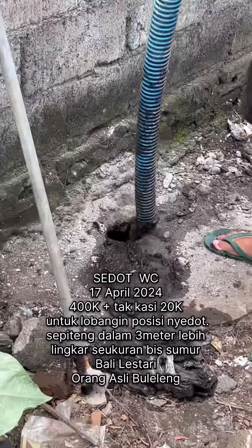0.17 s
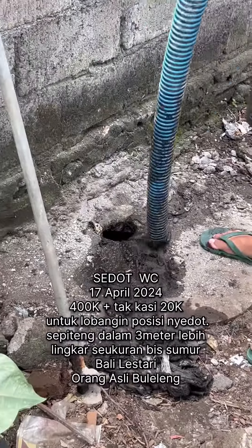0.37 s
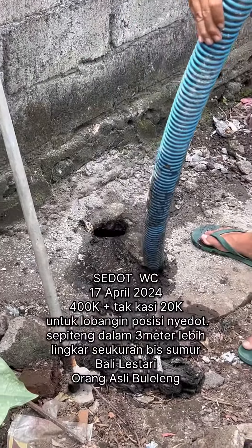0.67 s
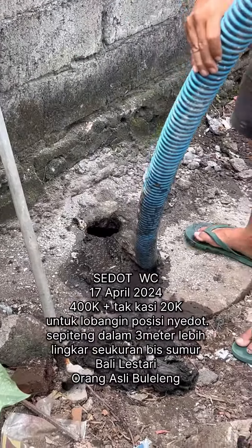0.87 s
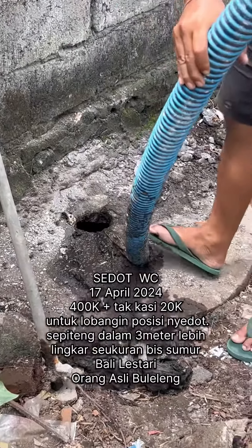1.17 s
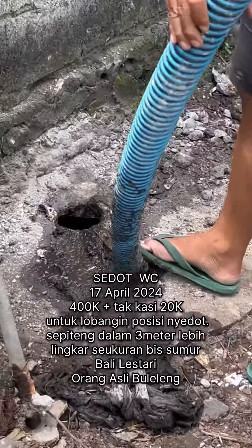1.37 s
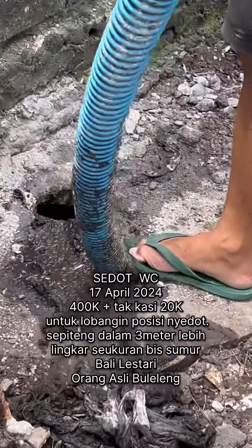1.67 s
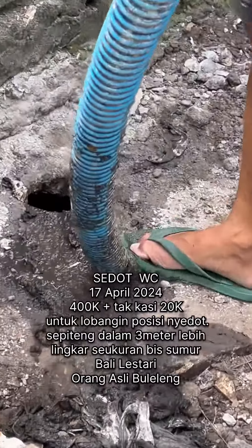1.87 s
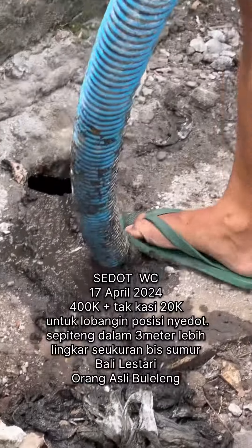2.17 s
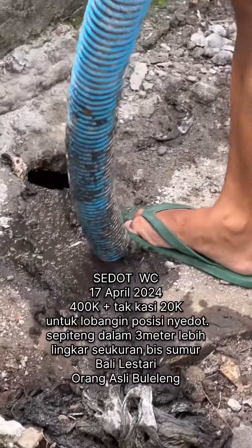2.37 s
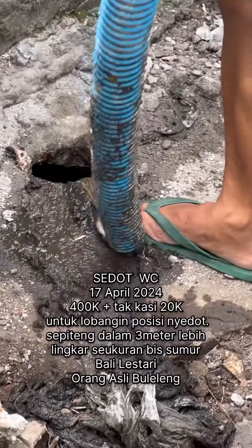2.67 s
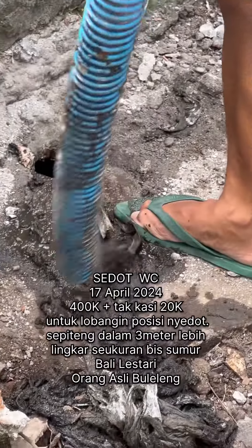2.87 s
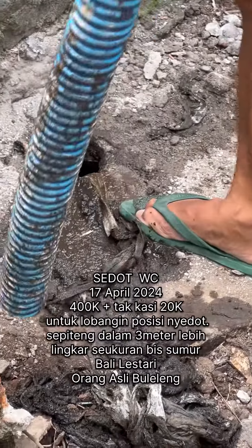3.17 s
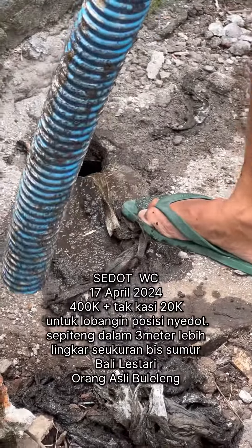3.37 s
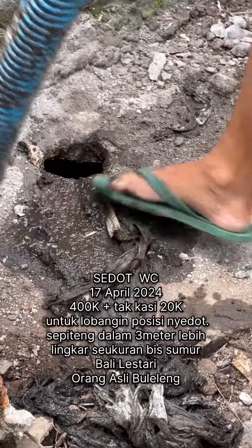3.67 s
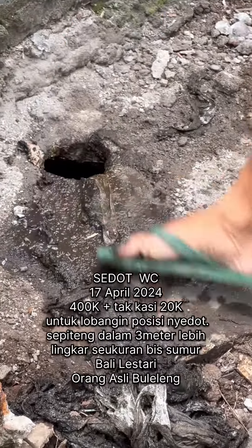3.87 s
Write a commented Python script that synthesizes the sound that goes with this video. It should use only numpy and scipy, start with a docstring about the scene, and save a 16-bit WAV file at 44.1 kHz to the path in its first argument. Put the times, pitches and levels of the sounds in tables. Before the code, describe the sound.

Close, mono outdoor sound of air sucked through a ribbed hose over a low rumble; the wet roar builds for over two seconds, then falls abruptly to thumps, small clicks and a faint whistle.

```python
"""A rush of air comes first: it is sucked through the mouth of a ribbed hose held just over the ground. The rush swells,
then drops as the hose is lifted away, leaving gulps in the hose, a thin whistle and a few ticks of grit.
The air is coloured noise with wet grains, combed by the ground's echo; narrow noise bands flare up briefly and a low
noise rumble runs underneath. Gulps and whistle are gliding sines, ticks are decaying noise and tones.
One microphone, the same on both channels."""
import sys
import numpy as np
from scipy import signal
from scipy.fft import rfft, irfft, next_fast_len
from scipy.io import wavfile
from scipy.ndimage import uniform_filter1d, map_coordinates

SR = 44100
rng = np.random.default_rng(int(sys.argv[2]) if len(sys.argv) > 2 else 0)


def master(y):
    """Save y as 16-bit WAV."""
    cut = np.clip(np.atleast_2d(y).T, -1, 1)
    pcm = np.round(cut * 32767)  # scale
    wavfile.write(sys.argv[1], SR, pcm.astype(np.int16))


N = 176400  # samples, 4 s


def amp(db):
    """dB to gain."""
    return 10 ** (np.asarray(db) / 20)


def unit(x):
    """Scaled to rms 1."""
    return x / np.sqrt(np.mean(x ** 2) + 1e-20)


def along(points, hz):
    """Value at each frequency, read between (Hz, value) points on a log axis."""
    f, v = np.transpose(points)
    return np.interp(np.log(hz + 1), np.log(f + 1), v)


def curves(rows):
    """One value per sample for each column after the time."""
    s, *columns = np.transpose(rows)
    return [np.interp(np.arange(N) / SR, s, column) for column in columns]


def wobble(rate):
    """A smooth random curve through normally distributed knots, rate knots a second."""
    knots = rng.standard_normal(int(N * rate / SR) + 4)
    return map_coordinates(knots, [np.arange(N) * rate / SR])


def filtered(x, response):
    """x times a complex response of frequency, padded so that its tail does not wrap round."""
    m = next_fast_len(N + SR // 2)
    return irfft(rfft(x, m) * response(np.fft.rfftfreq(m, 1 / SR)), m)[..., :N]


def coloured(x, spectrum, lo_hz=1, hi_hz=SR):
    """x through a spectrum between two soft edges, rms 1."""
    def response(hz):
        low, high = (hz / lo_hz) ** 8, (hz / hi_hz) ** 8
        return amp(along(spectrum, hz)) * np.sqrt(low / (1 + low) / (1 + high))
    return unit(filtered(x, response))


def noise(patchy_db, streak_db):
    """White noise with broad patches and narrow lasting streaks of random gain."""
    x = rng.standard_normal(N + 2048)
    # (frame in samples, depth in dB, smoothing over bins, smoothing over frames)
    for frame, depth_db, wide, long in [(512, patchy_db, 5, 10), (2048, streak_db, 4, 14)]:
        z = signal.stft(x, nperseg=frame)[2]
        field = uniform_filter1d(rng.standard_normal(z.shape), size=wide, axis=0)
        field = uniform_filter1d(field, size=long, axis=1)
        x = signal.istft(z * amp(depth_db * unit(field)), nperseg=frame)[1]
    return x[:N]


# Levels of the rumble. Each row: time in seconds, then deep, middle and upper part in dB.
RUMBLE_LEVELS = [(0.0, -47, -45, -32), (0.04, -36, -30.5, -30.5), (0.38, -27.5, -33, -34),
                 (0.6, -45, -36, -36), (0.79, -42, -35.5, -34.5), (0.81, -51, -40.5, -38),
                 (1.08, -40.5, -31, -36.5), (1.26, -48, -36.5, -36.5), (1.45, -33, -30.5, -32),
                 (1.48, -44, -40, -44), (1.54, -25, -36, -32.5), (1.75, -48, -36.5, -37.5),
                 (2.08, -42, -42, -36.5), (2.12, -37, -29, -38), (2.17, -46, -44, -35),
                 (2.33, -53, -38.5, -42), (2.71, -47, -36, -37.5), (2.75, -40, -33, -34),
                 (2.8, -34, -44, -39.5), (2.9, -35, -26, -32), (3.01, -33, -36.5, -41.5),
                 (3.06, -46, -39.5, -45.5), (3.27, -31, -39, -41), (3.34, -45, -42, -47),
                 (3.38, -35, -39, -34), (3.44, -31, -27.5, -40.5), (3.48, -32, -38, -34),
                 (3.51, -31, -34.5, -37.5), (3.6, -43, -42.5, -46.5), (3.74, -33, -41, -42),
                 (3.79, -50.5, -45, -47), (3.87, -41, -39, -39), (3.98, -50, -38, -44.5),
                 (4.0, -58, -41, -36)]
# Colours of the three parts. Each row: frequency in Hz, relative level in dB.
DEEP_COLOUR = [(24, -44), (40, -21), (53, -3), (70, 1), (105, -0.5), (140, -35), (240, -120)]
MIDDLE_COLOUR = [(60, -40), (100, -8.5), (140, 0), (220, -1), (290, -20.5), (500, -120)]
UPPER_COLOUR = [(150, -40), (230, -3), (290, 1.5), (340, -1.5), (422, -5), (520, -17.5), (680, -24),
                (1140, -120)]


def rumble():
    """A low rumble: three bands of noise whose levels share one lumpy unsteadiness."""
    lumps_db = 1.14 * wobble(11) + 0.43 * wobble(25.03)
    out = np.zeros(N)
    for level_db, colour in zip(curves(RUMBLE_LEVELS), [DEEP_COLOUR, MIDDLE_COLOUR, UPPER_COLOUR]):
        out += amp(level_db + lumps_db) * coloured(noise(patchy_db=1.4, streak_db=0.8), colour)
    return out


# Ticks of grit. Each row: start in seconds, level in dB of the crack before its rise and the top cut, pitch in Hz,
# ring amplitude against crack rms (ratio), decay by 60 dB in seconds, snap level in dB before the top cut.
GRIT_TICKS = [(2.856, -25, 3530, .86, .045, -23.5), (2.862, -21.5, 740, .4, 0.07, -45),
              (2.868, -27, 2780, 0.89, 0.13, -45), (3.0005, -27, 4470, 1.8, .035, -26),
              (3.002, -28, 2400, 0.76, 0.14, -45), (3.089, -28, 1840, .5, 0.032, -36),
              (3.109, -30, 6110, .3, .02, -36), (3.21, -31, 4000, .3, .02, -32),
              (3.36, -25, 1250, 0.78, .09, -39), (3.351, -33.5, 3270, 2.1, 0.11, -40),
              (3.3854, -28, 5000, .5, .022, -21), (3.393, -36, 9000, .1, .02, -28),
              (3.427, -21.5, 1090, 0.45, .035, -30), (3.51, -30, 1300, .4, .03, -37),
              (3.6563, -26, 2690, 0.59, .025, -27), (3.662, -28, 6500, .2, .04, -32),
              (3.7081, -22, 6240, 0.25, 0.022, -20), (3.807, -37, 7500, 0.27, .015, -35),
              (3.817, -24, 3380, 1.4, 0.016, -28), (3.8968, -28, 1760, .5, 0.035, -35)]
TICK_RISE_S, SNAP_T60_S, TICK_TOP_HZ = .0004, .005, 9500


def grit():
    """Short dry ticks: a sharp noise snap, then a noise crack with a ring at the same pitch, both decaying."""
    out, t = np.zeros(N + SR), np.arange(SR // 10) / SR
    for s, db, hz, ring, t60, snap_db in GRIT_TICKS:
        band = signal.butter(2, [hz * 0.56, min(hz * 1.52, SR / 3)], "bandpass", fs=SR)
        crack = unit(signal.lfilter(*band, rng.standard_normal(len(t))))
        shape = amp(db - 60 * t / t60) * (1 - np.exp(-t / TICK_RISE_S))
        snap = amp(snap_db - 60 * t / SNAP_T60_S) * rng.standard_normal(len(t))
        tick = shape * (ring * np.sin(2 * np.pi * hz * t) + crack) + snap
        out[round(s * SR):][:len(t)] += tick

    def top_cut(hz):
        ratio = hz / TICK_TOP_HZ
        return 1 / (1 + 1j * ratio * np.sqrt(2) - ratio ** 2) ** 2
    return filtered(out[:N], top_cut)


# The whistle. Each row: time in seconds, pitch in Hz, level in dB, level of the octave in dB.
WHISTLE_PATH = [(2.72, 5640, -45, -58), (2.74, 5640, -36, -54), (2.768, 5640, -48, -62),
                (2.786, 5630, -39, -52), (2.83, 5605, -42, -58), (2.855, 5600, -58, -70),
                (2.9, 5600, -55, -66), (2.93, 5600, -41, -60), (3.035, 5595, -39, -59),
                (3.055, 5570, -56, -64), (3.11, 5580, -49, -60), (3.14, 5605, -38, -55),
                (3.185, 5608, -34, -55), (3.215, 5550, -58, -68), (3.268, 5600, -43, -59),
                (3.3, 5612, -37.5, -61), (3.446, 5616, -33.5, -54), (3.5, 5650, -42, -47),
                (3.53, 5648, -38, -48), (3.614, 5588, -37.5, -63), (3.7, 5636, -35, -49),
                (3.75, 5642, -43, -54), (3.83, 5600, -35, -53), (3.86, 5572, -45, -68),
                (3.906, 5580, -40, -62), (3.974, 5510, -51, -75), (4.0, 5540, -43, -65)]
WHISTLE_WAVER_HZ, WHISTLE_FLICKER_DB = 9, 1.8  # sizes of the random waver and flicker


def whistle():
    """A thin wavering sine with a weak octave, heard once the rush has dropped."""
    hz, level_db, octave_db = curves(WHISTLE_PATH)
    phase = 2 * np.pi * np.cumsum(hz + WHISTLE_WAVER_HZ * wobble(70)) / SR
    # fades in over the 20 ms before the first row
    start = np.clip((np.arange(N) / SR - WHISTLE_PATH[0][0]) / .02 + 1, 0, 1)
    tone = amp(level_db) * np.sin(phase)
    octave = amp(octave_db + 3.3 * wobble(110)) * np.sin(2 * phase)
    flicker = amp(WHISTLE_FLICKER_DB * wobble(90))
    return np.sqrt(2) * start * flicker * (tone + octave)  # sqrt(2): levels are rms


# Gulps in the hose. Each row: start in seconds, level in dB before the attack and GULP_GAIN, starting pitch in Hz,
# decay by 60 dB in seconds.
HOSE_GULPS = [(2.726, -20.5, 146, 0.19), (2.823, -9.5, 129, 0.043), (2.863, -16, 164.7, 0.33),
              (2.965, -20.5, 95, 0.21), (3.365, -25, 144.5, 0.33), (3.41, -20, 112, 0.19),
              (3.493, -20.5, 94, 0.11)]
GULP_GAIN, GULP_ATTACK_S = 1.65, 0.0082
GULP_SAG, GULP_SAG_S = 0.24, 0.027  # share by which the pitch falls, time constant of the fall


def gulps():
    """Slugs of air thump in the hose: decaying sines, each falling in pitch."""
    out, t = np.zeros(N + SR), np.arange(SR // 2) / SR
    for s, db, hz, t60 in HOSE_GULPS:
        pitch = hz * (1 - GULP_SAG * (1 - np.exp(-t / GULP_SAG_S)))
        shape = amp(db - 60 * t / t60) * (1 - np.exp(-t / GULP_ATTACK_S))
        out[round(s * SR):][:len(t)] += GULP_GAIN * shape * np.sin(2 * np.pi * np.cumsum(pitch) / SR)
    return out[:N]


# Brief flares of one hose resonance. Each row: middle in seconds, length in seconds, pitch in Hz,
# level in dB before the roughness.
HOSE_FLARES = [(0.637, 0.043, 2510, -28), (0.842, 0.085, 3170, -24), (1.105, 0.067, 3150, -27),
               (2.647, 0.11, 1540, -27), (3.371, 0.043, 1900, -34.5)]
FLARE_WIDTH_HZ = 200  # from the middle of the band to 1/e


def flares():
    """One resonance of the hose flares up briefly: swells of rough noise in a narrow band."""
    t, rough = np.arange(N) / SR, amp(2.9 * wobble(70))
    out = np.zeros(N)
    for s, length, pitch, db in HOSE_FLARES:
        band = filtered(rng.standard_normal(N), lambda hz: np.exp(-((hz - pitch) / FLARE_WIDTH_HZ) ** 2))
        swell = np.exp(-(2 * (t - s) / length) ** 4)
        out += amp(db) * swell * unit(band)
    return rough * out


SPATTER_PER_S, SPATTER_HZ = 180, 1790  # grains a second, middle pitch
SPATTER_CYCLES = 31.5  # scale of a grain's life, times 0.49 to 1.49
SPATTER_BEND = -0.0073  # slight downward bend of the pitch along a grain


def spatter():
    """Wet grains: short damped tones at random times, pitches scattered over two octaves, rms 1."""
    when, pitch, size, life = rng.random((4, int(SPATTER_PER_S * N / SR)))
    hz = SPATTER_HZ * 4 ** (pitch - .5)[:, None]
    t = np.arange(SR // 16) / SR
    age = t * hz / (SPATTER_CYCLES * (0.49 + life[:, None]))
    shape = (0.23 + size[:, None] ** 2) * age * np.exp(-3 * age)
    grains = shape * np.sin(2 * np.pi * hz * t * (1 + SPATTER_BEND * age))
    at = (when * N).astype(int)[:, None] + np.arange(len(t))
    return unit(np.bincount(at.ravel(), grains.ravel(), N + SR)[:N])


# Path of the hose mouth. Each row: time in seconds, position number from 0 to 5, in the order of the colours below.
MOUTH_PATH = [(0, 0), (.4, 0), (.55, 1), (1.2, 1), (1.45, 2), (2.54, 2), (2.61, 3), (2.66, 3), (2.72, 4),
              (2.8, 4), (3.0, 5), (4, 5)]
# Colours of the air in the six positions. Each row: frequency in Hz, relative level in dB.
AT_HOLE_COLOUR = [(260, -44), (450, -5.5), (703, -12.5), (746, -12), (1250, -4), (2020, -10), (3880, -3),
                  (4510, -7.5), (5890, -4), (11500, -8), (13500, -18), (15700, -17)]
DRAGGED_COLOUR = [(260, -50), (450, -6.5), (588, -12.5), (815, -5.5), (1070, -8.5), (1270, -11.5),
                  (1580, 0.5), (2100, -7.5), (2500, -3.5), (2880, -5), (3150, -2), (3600, -7), (3970, -1),
                  (4350, -8), (4800, -5.5), (5630, -8.5), (11300, -7.5), (13300, -20), (15700, -16)]
HELD_COLOUR = [(260, -46), (450, -21), (530, -11), (672, -10.5), (865, -7.5), (1250, -5), (1550, -2.5),
               (1870, -3), (2080, -12.5), (2480, 0.5), (2900, -6.5), (3700, -3.5), (4250, -8), (4700, -8),
               (8410, -10.5), (11300, -10.5), (13300, -22), (15700, -20)]
SLIPPING_COLOUR = [(260, -48), (500, -11), (860, -0.5), (1150, -9), (1580, 1.5), (2000, -13), (2450, -3),
                   (2900, -10), (3180, -6), (3600, -13.5), (5550, -17), (11300, -23), (15700, -33)]
LEAVING_COLOUR = [(260, -46), (450, -26), (499, -16), (703, 2.5), (1050, -8), (1380, -1.5), (1800, -13),
                  (2130, -9), (2680, -14), (3450, -11.5), (4000, -13), (5550, -22), (15700, -37)]
LIFTED_COLOUR = [(260, -37), (450, -7), (540, -7), (750, -3), (1000, -8), (1250, 1.5), (1550, -3.5),
                 (1850, -1), (2350, -7.5), (2800, -6.5), (3100, -10.5), (3450, -10), (4100, -13),
                 (6500, -15), (9900, -21.5), (11800, -21.5), (13300, -38), (15700, -32)]


def mouth(x, lo_hz, hi_hz):
    """One range of x in the colour of the mouth's present position, crossfading between neighbours."""
    position, = curves(MOUTH_PATH)
    colours = [AT_HOLE_COLOUR, DRAGGED_COLOUR, HELD_COLOUR, SLIPPING_COLOUR, LEAVING_COLOUR, LIFTED_COLOUR]
    out = np.zeros(N)
    for k, colour in enumerate(colours):
        nearness = np.clip(1 - abs(position - k), 0, 1)
        out += nearness * coloured(x, colour, lo_hz, hi_hz)
    return out


# Reflection from the ground. Each row: frequency in Hz, gain of the echo at full strength (ratio).
GROUND_ECHO = [(500, 1.05), (1300, 0.16), (2050, 0.1), (2800, 0.073), (3600, 0.08), (4400, 0.1),
               (6000, 0.052), (12000, .1)]
FIRST_NOTCH_HZ, NOTCH_STEP_HZ = 530, 765


def ground(x, strength):
    """The ground's short echo cuts evenly spaced notches."""
    def reflection(hz):
        return along(GROUND_ECHO, hz) * np.exp(-2j * np.pi * (hz - FIRST_NOTCH_HZ) / NOTCH_STEP_HZ)
    return x - np.clip(strength, 0, 1) * filtered(x, reflection)


# The air stream before the echo. Each row: time in seconds, roar in dB, rush in dB, hiss in dB before HISS_LIFT_DB,
# strength of the ground echo from 0 to 1.
AIR_FLOW = [(0.0, -35, -29, -33, 0.6), (0.01, -29.5, -33.5, -32.5, 0), (0.15, -32.5, -27, -32, 0.2),
            (0.18, -25.5, -26, -30.5, 0.3), (0.24, -25.5, -27.5, -34.5, 0.3), (0.32, -29, -32.5, -38, 0.6),
            (0.41, -24.5, -24, -29, 1), (0.43, -27.5, -23, -26, 0.9), (0.54, -27, -25, -28, 0.7),
            (0.59, -25.5, -23, -26, 0.72), (0.75, -24, -24, -30, 0.8), (0.86, -25, -21.5, -28.5, 0.9),
            (0.98, -26, -20.5, -30.5, 0.5), (1.01, -27.5, -26.5, -33, 0.75), (1.1, -25, -20.5, -29.5, 0.56),
            (1.64, -21, -15, -22.5, 0.76), (1.8, -24.5, -16.5, -25, 1), (1.97, -23, -18, -22.5, 0.7),
            (2.0, -22.5, -14, -25, 0.5), (2.04, -20, -22, -26.5, 1), (2.33, -23.5, -15.5, -23, 0.8),
            (2.42, -20, -13, -20.5, 0.8), (2.53, -18.5, -14, -23, 1), (2.57, -20, -21, -28, 0.5),
            (2.6, -25, -21, -30, 0.6), (2.615, -19, -24, -32, 0.7), (2.66, -23.5, -32, -34.5, 0.6),
            (2.75, -24, -32.5, -31, 0.1), (2.81, -33.5, -37, -40, 0), (2.85, -32, -37, -38, 0.1),
            (2.87, -31, -34, -33, 0.6), (2.9, -32.5, -30, -37.5, 0.6), (2.99, -27.5, -36, -38, 0),
            (3.01, -32, -38, -40, 0.3), (3.04, -36, -36, -42, 0.1), (3.2, -39, -45.5, -51, 0.3),
            (3.34, -38.5, -38, -47, 0.1), (3.36, -35, -40, -50, 0.4), (3.4, -35, -34, -45, 0.14),
            (3.5, -27.5, -37, -50, 0.4), (3.55, -37, -39.5, -46.5, 0.1), (3.64, -38, -38, -43.5, 0.5),
            (3.7, -38, -36.5, -47, 0.28), (3.73, -36, -42.5, -48, 0.4), (3.8, -36.5, -38.5, -48, 0.8),
            (3.95, -39, -41, -48, 0.32), (4.0, -49, -43, -51, 0.6)]
# Wetness of the air. Each row: time in seconds, spatter in dB before SPATTER_DB, against the mean of roar and rush dB.
SPATTER_SHARES = [(0, -16), (.5, -2.5), (2.5, -11), (2.7, -4.5), (4, 6)]
ROAR_TOP_HZ, HISS_FROM_HZ = 2160, 5440
SURGE_DB, HISS_LIFT_DB, SPATTER_DB = 0.49, 0.5, -6  # surge: slow unsteadiness of the flow


def air():
    """Turbulence at the hose mouth: noise in three ranges that share a slow surge, with wet spatter."""
    roar_db, rush_db, hiss_db, echo = curves(AIR_FLOW)
    surge_db = SURGE_DB * wobble(6.62)
    roar_gain = amp(roar_db + 0.56 * surge_db + 0.85 * wobble(60))
    rush_gain = amp(rush_db + surge_db + 0.58 * wobble(90))
    hiss_gain = amp(hiss_db + HISS_LIFT_DB + surge_db + 0.87 * wobble(300))
    roar = roar_gain * mouth(noise(patchy_db=1.3, streak_db=1.5), 1, ROAR_TOP_HZ)
    rush = rush_gain * mouth(noise(patchy_db=0.98, streak_db=2.86), ROAR_TOP_HZ, HISS_FROM_HZ)
    hiss = hiss_gain * mouth(noise(patchy_db=1.8, streak_db=1.3), HISS_FROM_HZ, SR)
    share_db, = curves(SPATTER_SHARES)
    wet = amp((roar_db + rush_db) / 2 + SPATTER_DB + share_db) * spatter()
    return ground(roar + rush + hiss + wet, echo)


def scene():
    """All sources at one microphone, the same on both channels."""
    mono = rumble() + grit() + whistle() + gulps() + flares() + air()
    return np.tile(mono, (2, 1))


LOW_CUT_HZ, TOP_HZ = 28, 15730
PEAK = .97  # ceiling of the rounding, full scale is 1


def record(dry):
    """The microphone drops the deepest bass, peaks are rounded off, nothing is kept above the band limit."""
    x = filtered(dry, lambda hz: (hz / LOW_CUT_HZ) ** 3 / (1 + (hz / LOW_CUT_HZ) ** 3))
    x = x / (1 + abs(x / PEAK) ** 6) ** (1 / 6)
    return filtered(x, lambda hz: hz < TOP_HZ)


dry = scene()
out = record(dry)
master(out)
```